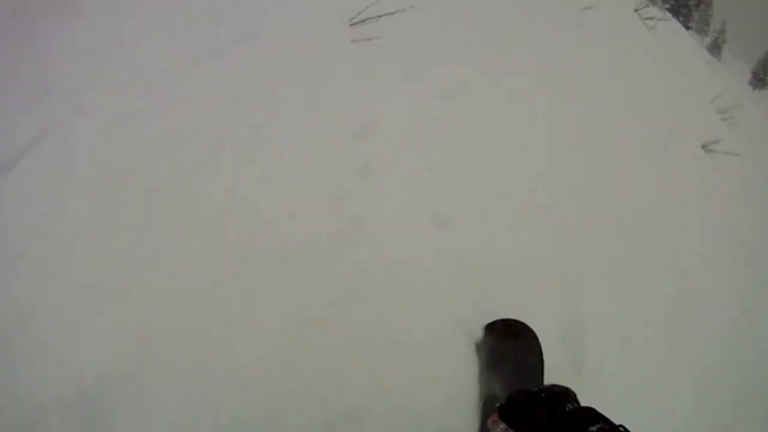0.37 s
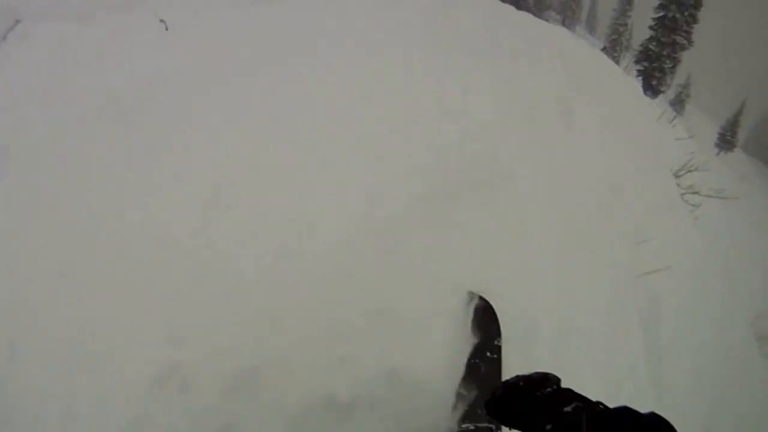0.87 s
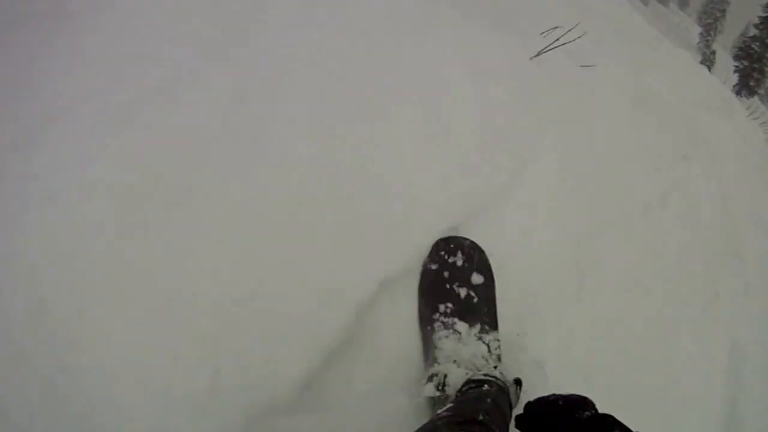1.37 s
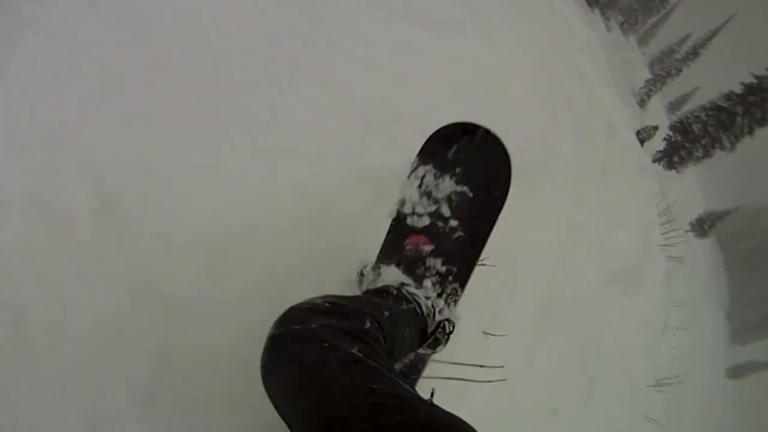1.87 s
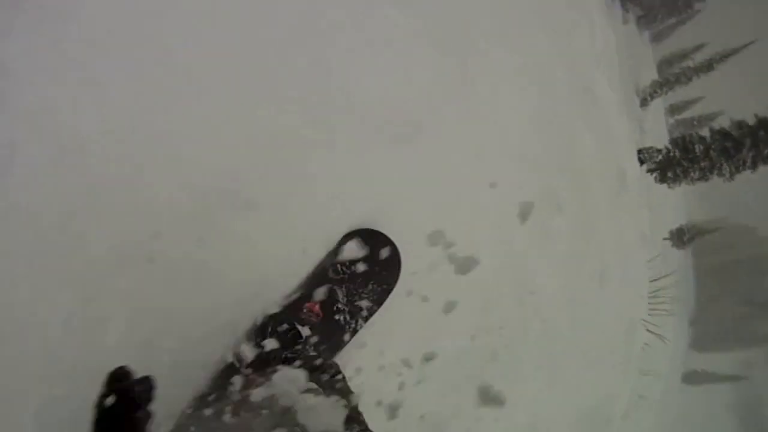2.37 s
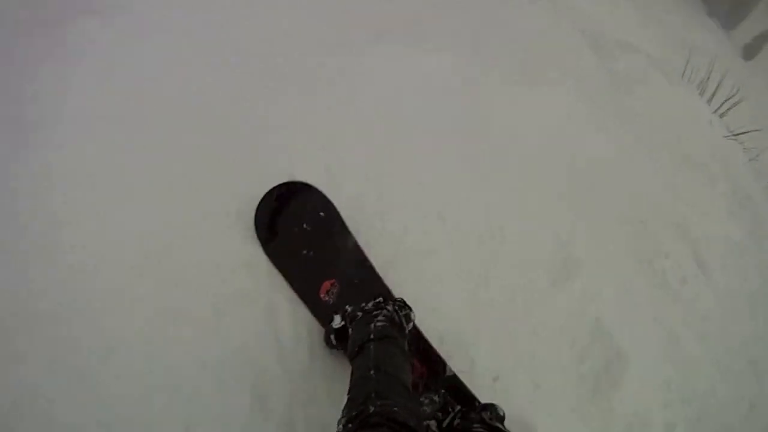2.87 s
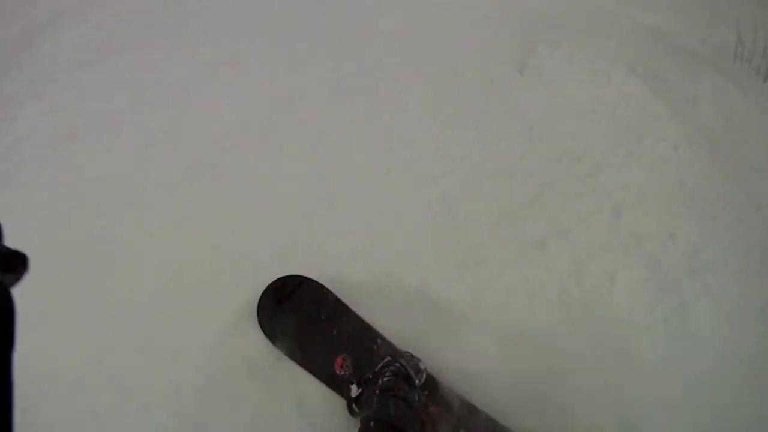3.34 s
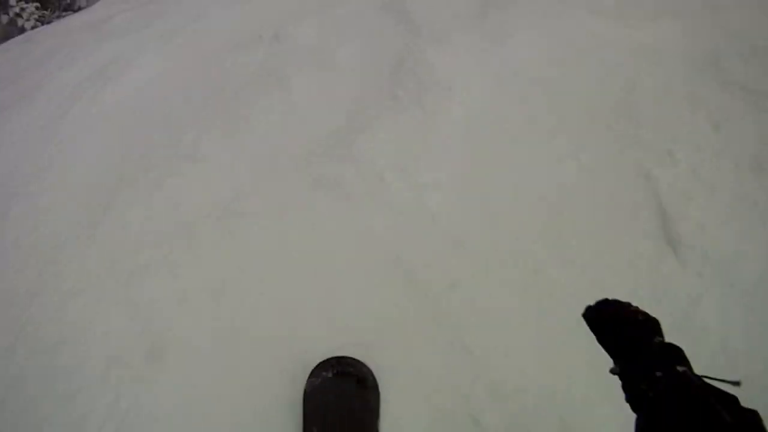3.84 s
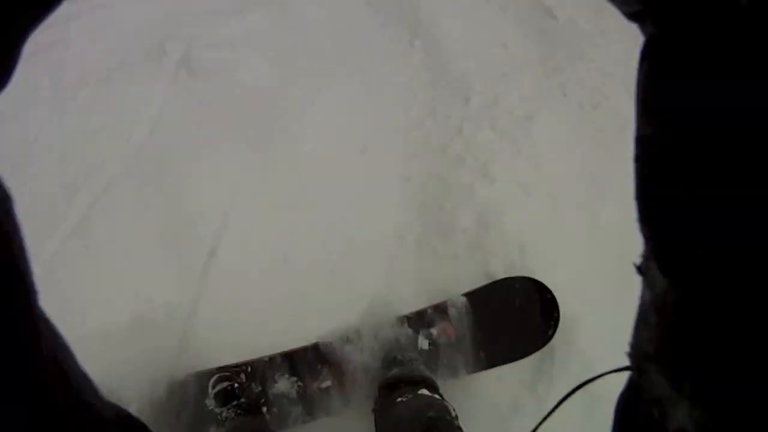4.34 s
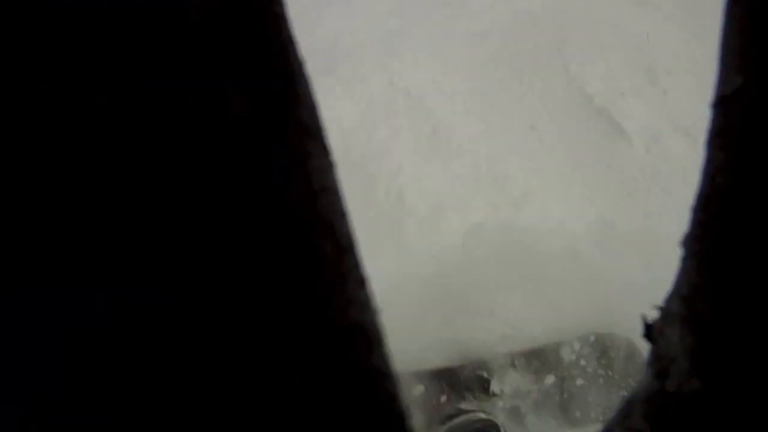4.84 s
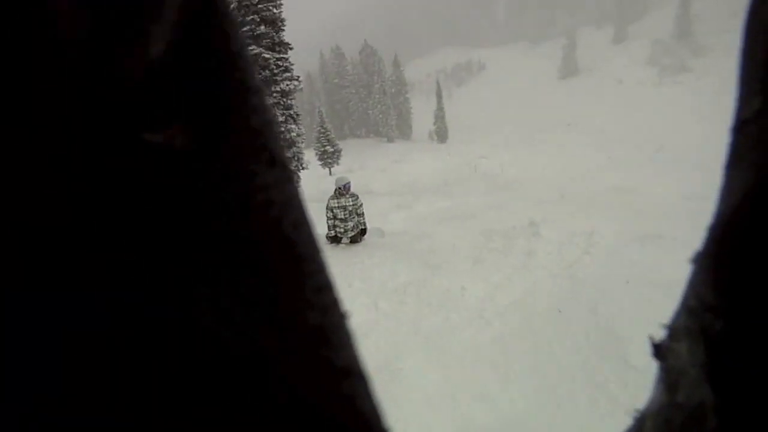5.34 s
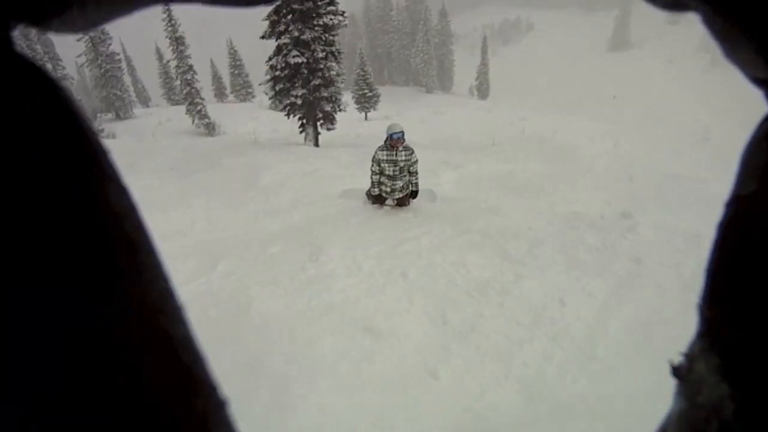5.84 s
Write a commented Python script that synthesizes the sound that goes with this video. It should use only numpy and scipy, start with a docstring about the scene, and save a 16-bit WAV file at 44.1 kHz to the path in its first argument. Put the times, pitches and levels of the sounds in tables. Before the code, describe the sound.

Close, muffled-plastic perspective on an open snowy slope. At first small quick rattles sit on soft granular snow hiss and low wind; sharp cracks with dull thumps strike between about 1.7 and 2.1 seconds. A calmer, fading glide follows. From 4.3 seconds stiff glove fabric scrapes and crackles directly on the microphone case, loud and clipped, with tiny plastic squeaks, ending on a heavy snap.

```python
"""Snowboard ride through powder, the microphone close in, sealed in a plastic housing on the rider's helmet.
From the start wind noise rumbles in lumps, snow gives a grainy hiss over a low murmur, and the housing knocks on
its mount as noise bursts with ringing thumps. Plastic squeaks briefly and snow sprays over the housing on the way.
From about 4.3 s gloves still the mount, rub and snap as dense cloth grains, and overload the microphone.
Hiss, rubs and cracks pass through the housing resonances; the sound is almost mono."""
import sys
import numpy as np
from scipy import signal
from scipy.fft import rfft, irfft, next_fast_len
from scipy.io import wavfile
from scipy.ndimage import uniform_filter1d, map_coordinates

SR = 44100
rng = np.random.default_rng(int(sys.argv[2]) if len(sys.argv) > 2 else 0)


def magnitude_from_level(level_db):
    """Linear magnitude for a level in decibels (20 dB per decade)."""
    exponent = np.asarray(level_db, float) / 20
    return 10 ** exponent


def transcribe(signal):
    """Save signal, clipped to [-1, 1], as a 16-bit WAV file at the path in sys.argv[1]."""
    frames = np.atleast_2d(signal).T
    limited = np.clip(frames, -1, 1)
    pcm = np.round(limited * 32767).astype(np.int16)
    wavfile.write(sys.argv[1], SR, pcm)


N = 262836
GRIP_S = 4.3  # the gloves take hold and still the rattling mount


def unit(x):
    """Scale to rms 1."""
    return x / np.sqrt(np.mean(x ** 2) + 1e-20)


def filtered(x, response):
    """x times a complex response of frequency."""
    m = next_fast_len(N + SR // 4)
    return irfft(rfft(x, m) * response(np.fft.rfftfreq(m, 1 / SR)), m)[..., :N]


def coloured(points):
    """Gain of (f/Hz, level/dB) points on a log axis."""
    f, db = np.transpose(points)
    return lambda hz: magnitude_from_level(np.interp(np.log(hz + 1), np.log(f + 1), db))


def wobble(rate):
    """A smooth random curve, rate knots a second."""
    knots = rng.standard_normal(int(N * rate / SR) + 4)
    return map_coordinates(knots, [np.arange(N) * rate / SR])


def drifting(depth_db):
    """White noise whose colour drifts: random gain patches some hundred Hz wide and tens of ms long."""
    z = signal.stft(rng.standard_normal(N), nperseg=256)[2]
    field = uniform_filter1d(rng.standard_normal(z.shape), 5, axis=0)
    field = uniform_filter1d(field, 12, axis=1)
    patched = z * magnitude_from_level(depth_db * unit(field))
    return unit(signal.istft(patched, nperseg=256)[1][:N])


def crackle(per_second, size_db, t60):
    """Envelope of random small contacts: capped exponential sizes in dB, each dying fast."""
    hit = rng.random(N) < per_second / SR
    size = hit * magnitude_from_level(size_db * np.minimum(rng.exponential(size=N), 3))
    decay = magnitude_from_level(-60 * np.arange(SR // 20) / SR / t60)
    return signal.fftconvolve(size, decay)[:N]


# resonances of the housing around the microphone: (f/Hz, width/Hz, relative level/dB)
RESONANCES = [(1285, 90, -1.5), (1547, 230, -1.5), (1935, 296, 4.5), (2150, 180, -9), (3280, 312, -1.5),
              (4960, 160, -16.5), (7050, 300, -17), (8640, 270, -8), (10260, 720, -9), (13780, 180, -9),
              (14500, 240, -11.5)]
# cancellations in the housing: (f/Hz, distance to 1/e of the depth/Hz, gain at the centre/dB)
CANCELLATIONS = [(5995, 437, -14.5)]


def housing(hz):
    """Causal response of the housing, noise gain 1: resonance powers add, hollows cut, phase is minimal."""
    power = sum(magnitude_from_level(2 * db) / (1 + ((hz * hz - c * c) / (hz * w + 1)) ** 2) for c, w, db in RESONANCES)
    cut_db = sum(db * np.exp(-((hz - c) / w) ** 2) for c, w, db in CANCELLATIONS)
    gain = unit(np.sqrt(power) * magnitude_from_level(cut_db))
    # folding the cepstrum gives the minimum phase
    cepstrum = irfft(np.log(gain + 1e-5))
    half = len(cepstrum) // 2
    cepstrum[1:half] *= 2
    cepstrum[half + 1:] = 0
    return np.exp(rfft(cepstrum))


def groups(hz):
    """The housing's low, middle and high resonances, each group with noise gain 1."""
    under = [1 / (1 + (hz / edge_hz) ** 8) for edge_hz in (2700, 6000)]
    shares = [under[0], under[1] - under[0], 1 - under[1]]
    whole = housing(hz)
    return np.array([share * whole / np.sqrt(np.mean(abs(share * whole) ** 2)) for share in shares])


def microphone(hz):
    """The microphone in its housing: deaf near 12 kHz, closed above about 15.6 kHz."""
    notch = magnitude_from_level(-24 * np.exp(-((hz - 11900) / 1200) ** 2))
    return notch / (1 + (hz / 15600) ** 60)


# side over mid before it flickers: (f/Hz, level/dB)
SIDE_COLOUR = [(50, -39), (300, -18), (1400, -37.5), (5000, -41.5), (14000, -28.5)]


def almost_mono(mid):
    """Two channels that differ by a faint, flickering, filtered copy of the mid."""
    side = filtered(mid * wobble(40), coloured(SIDE_COLOUR))
    return np.array([mid + side, mid - side])


# course of the ride, levels before each layer's trim: (t/s, wind level/dB, snow flow level/dB)
RIDE_COURSE = [(0.0, -56.5, -43), (0.17, -48.5, -48), (0.4, -56, -50.5), (0.75, -53, -52.5),
               (1.04, -54.5, -56), (1.26, -60.5, -51), (1.55, -61, -59), (1.8, -44.5, -54.5),
               (2.13, -44.5, -52.5), (2.38, -49, -52.5), (2.68, -57.5, -54.5), (3.1, -52, -54.5),
               (3.33, -57.5, -58.5), (3.5, -53, -56), (3.64, -73, -63.5), (3.88, -72, -66.5),
               (4.049, -62, -59), (4.3, -63.5, -64), (4.6, -43.5, -47), (4.81, -60, -45), (5.2, -54.5, -65),
               (5.96, -67, -46)]


def levels():
    """Gain per sample of rumble, murmur and hiss; the murmur follows a blend of wind and snow flow."""
    s, wind_db, snow_db = np.transpose(RIDE_COURSE)
    wind_share = 0.53
    murmur_db = -11 + wind_share * wind_db + (1 - wind_share) * snow_db
    return [magnitude_from_level(np.interp(np.arange(N) / SR, s, curve)) for curve in (wind_db, murmur_db, snow_db)]


# wind noise close on the housing, relative spectrum: (f/Hz, level/dB per Hz)
WIND_COLOUR = [(15, -39), (28, -0.5), (54, 2), (80, -12), (140, -28), (200, -52), (300, -120)]


def wind_rumble(gain):
    """Wind is low noise that swells in irregular lumps."""
    noise = filtered(rng.standard_normal(N), coloured(WIND_COLOUR))
    return magnitude_from_level(3.5) * gain * unit(noise * magnitude_from_level(1.9 * wobble(10)))


# low murmur of the board in the snow, relative spectrum: (f/Hz, level/dB per Hz)
MURMUR_COLOUR = [(70, -18), (130, 0.5), (250, -6), (450, -14), (900, -17.5), (1400, -32)]


def board_murmur(gain, grain):
    """The board in the snow murmurs: low noise that feels the snow grains only weakly."""
    noise = rng.standard_normal(N) * grain ** 0.3 * magnitude_from_level(1.5 * wobble(20))
    return magnitude_from_level(-1.0) * gain * unit(filtered(noise, coloured(MURMUR_COLOUR)))


def snow_hiss(gain, grain):
    """Snow grains drive the housing as crackling noise of drifting colour."""
    return gain * filtered(drifting(depth_db=3.0) * grain, housing)


def bed():
    """Wind, murmur and hiss together; murmur and hiss share the same snow grains."""
    rumble, murmur, hiss = levels()
    grain = unit(0.66 + crackle(150, size_db=3.5, t60=0.0083)) * magnitude_from_level(0.17 * wobble(30))
    return wind_rumble(rumble) + board_murmur(murmur, grain) + snow_hiss(hiss, grain)


# short squeaks of plastic slipping on plastic: (t/s, length/s, f/Hz, level/dB)
PLASTIC_SQUEAKS = [(1.875, 0.022, 2070, -41), (3.5, 0.02, 740, -55), (4.567, .014, 1940, -26.5),
                   (4.584, 0.018, 1986, -20.5), (4.702, .012, 1880, -23.5)]


def squeaks():
    """Each squeak is a slightly hoarse tone that swells and fades, with a weak overtone."""
    t, out = np.arange(N) / SR, np.zeros(N)
    for s, length, hz, db in PLASTIC_SQUEAKS:
        phase = 2 * np.pi * np.cumsum(hz * (1 + 0.016 * wobble(250))) / SR
        swell = np.sin(np.pi * np.clip((t - s) / length, 0, 1)) ** 2
        out += magnitude_from_level(db) * swell * (np.sin(phase) + magnitude_from_level(-25) * np.sin(2 * phase))
    return out


def scattered(gain, count, over_db, size_db, bright_db, spread_db, low_db):
    """Small contacts at random moments, as strong as the motion that shakes them loose."""
    when, size = rng.random((count, 2)).T
    colour, weight = rng.standard_normal((count, 2)).T
    local = gain[(when * N).astype(int)]
    peak_db = 20 * np.log10(local + 1e-9) + over_db - size_db * np.log(1 - 0.95 * size)
    rows = np.transpose([when * N / SR, peak_db, bright_db + spread_db * colour, low_db + spread_db * weight])
    return list(rows[local > 0])


def contacts(events, modes, crack_db, thump_db, attack, t60, tail_db, treble_db, follows):
    """A contact is a noise burst with a weak tail into three housing groups, plus a low ringing thump."""
    t = np.arange(SR // 8) / SR
    shape = (magnitude_from_level(-60 * t / t60) + magnitude_from_level(tail_db - 60 * t / 0.02)) * (1 - np.exp(-t / attack))
    shape /= shape.max()
    drive, thump = np.zeros((3, N + len(t))), np.zeros(N + len(t))
    for s, db, bright_db, low_db in events:
        at = slice(round(s * SR), round(s * SR) + len(t))
        burst = rng.standard_normal(len(t)) * shape
        burst *= np.linalg.norm(shape) / np.linalg.norm(burst)
        # brightness lifts the middle group fully and the top group in part
        group_db = np.array([[0], [bright_db], [treble_db + follows * bright_db]])
        drive[:, at] += magnitude_from_level(db + crack_db + group_db) * burst
        ring = np.zeros(len(t))
        for (hz, mode_db, mode_t60), vary_db in zip(modes, rng.normal(0, 2.55, len(modes))):
            ring += magnitude_from_level(mode_db + vary_db - 60 * t / mode_t60) * np.sin(2 * np.pi * hz * t)
        thump[at] -= magnitude_from_level(db + low_db + thump_db) * ring * (1 - np.exp(-t / 0.0014))
    cracks = filtered(drive[:, :N], groups).sum(axis=0)
    return cracks + np.roll(thump, round(0.0019 * SR))[:N]  # the thump follows the crack


# loud taps of the housing on its mount, levels before trim:
# (t/s, peak level/dB, brightness level/dB, thump level over peak/dB)
MOUNT_TAPS = [(0.0659, -35, -8, -24), (0.114, -31.5, -2.5, -31), (0.1319, -32, -1, -20),
              (0.172, -43.5, -13, 0), (0.2067, -34, -7, -18), (0.2526, -24.5, -23, -36),
              (0.2593, -28, -16, -30), (0.2742, -27, -21, -11.5), (0.3383, -36.5, 2, -12),
              (0.346, -37.5, 4, -23), (0.3563, -30.5, -3, -28), (0.4355, -32.5, -5, -33),
              (0.4821, -31, -6, -33), (0.5363, -32.5, -2.5, -29), (0.581, -34, -9, -16),
              (0.593, -33, -16, -19), (0.6222, -37, -3, -19), (0.6363, -33.5, -14, -20),
              (0.7639, -32, -4.5, -14), (0.9192, -38, 4, -24), (1.0386, -35.5, -20, -8.5),
              (1.1436, -34.5, -3.5, -29), (1.1609, -30.5, -11.5, -32), (1.2106, -38, -8, -37),
              (1.5641, -44.5, 3.5, -28), (1.599, -41, -2, -24), (1.6224, -34, -7, -29),
              (1.6649, -9.5, -6, -23.5), (1.755, -36.5, -19, -36), (1.823, -17.5, -28, 0.5),
              (1.8716, -29.5, -17, -26), (1.9328, -14.5, -23, -19), (1.9477, -26, -14, -16),
              (1.956, -24.5, -20, -17), (2.0115, -24, -9, -28), (2.0155, -12.5, -5, -1.5),
              (2.0271, -22, -18, -0.5), (2.0423, -26, -20, -15), (2.05, -23, -2.5, 0),
              (2.0851, -14, -10.5, -32), (2.1143, -34.5, -16, -19), (2.275, -42.5, -13, 0.5),
              (2.435, -41.5, -12, -3), (2.755, -41, -2.5, -10), (2.8016, -38.5, -1, -23),
              (3.0838, -31.5, -17, -31), (3.181, -42.5, 2, -28), (3.2393, -45.5, 2, -20),
              (3.3294, -47, 0.5, -17), (3.5448, -38, -7.5, -32.5), (3.8903, -45.5, -7, -19),
              (4.1002, -18, -5, -21), (4.268, -38.5, -3, -26)]
# helmet and mount modes, before random scatter: (f/Hz, level/dB, t60/s)
MOUNT_MODES = [(53.4, 1, 0.024), (128.3, 8, 0.044), (311, -8.5, 0.063), (563, -3.5, 0.043),
               (716, -15.5, 0.075)]


def mount_taps():
    """The housing knocks and rattles on its mount, small taps following the snow flow until the grip."""
    shaking = levels()[2] * (np.arange(N) < GRIP_S * SR)
    small = scattered(shaking, count=85, over_db=7, size_db=3.0, bright_db=-4.5, spread_db=4.5, low_db=-13)
    return contacts(MOUNT_TAPS + small, MOUNT_MODES, crack_db=-3.0, thump_db=-4.5, attack=0.00041, t60=0.0077,
                    tail_db=-20, treble_db=-4.0, follows=0.29)


# strokes over the housing, first snow spray, then glove cloth:
# (start t/s, end t/s, first level/dB, last level/dB, brightness level/dB)
HOUSING_STROKES = [(1.908, 1.97, -42, -44.5, -2), (2.96, 3.098, -43.5, -58, 4),
                   (4.368, 4.414, -30, -39.5, -0.5), (4.482, 4.547, -28, -38, 1),
                   (4.568, 4.602, -38, -35, 9), (4.697, 4.902, -34.5, -35.5, 7.5),
                   (4.906, 5.085, -39.5, -46, 6.2), (5.088, 5.229, -36, -38.5, 5),
                   (5.236, 5.362, -34.5, -38, 5), (5.403, 5.441, -52, -31.5, 6),
                   (5.445, 5.557, -33.5, -35, 8), (5.559, 5.602, -39, -40.5, 3),
                   (5.603, 5.667, -28.5, -46.5, 7), (5.664, 5.75, -32, -33, 2.5),
                   (5.758, 5.785, -56.5, -48, 6.5), (5.786, 5.95, -41.5, -42, 4.5)]


def strokes():
    """Gain per sample of the strokes and of their treble."""
    t = np.arange(N) / SR
    body, treble = np.zeros((2, N))
    for start, end, first_db, last_db, bright_db in HOUSING_STROKES:
        stroke = magnitude_from_level(np.interp(t, [start, end], [first_db, last_db])) * ((t >= start) & (t < end))
        body += stroke
        treble += magnitude_from_level(bright_db) * stroke
    return body, treble


def crossover(body, treble, hz_cross):
    """Lows of one drive and highs of another, sent through the housing."""
    high = lambda hz: 1 / (1 + (hz_cross / (hz + 1)) ** 4)
    lows = filtered(body, lambda hz: (1 - high(hz)) * housing(hz))
    return lows + filtered(treble, lambda hz: high(hz) * housing(hz))


# low rustle under each stroke, relative spectrum: (f/Hz, level/dB per Hz)
RUSTLE_COLOUR = [(53, -27), (90, 4.5), (204, -0.5), (433, -7.5), (535, -6.5), (694, -11.5), (900, -9),
                 (1170, -22), (1980, -120)]


def rubbing():
    """Spray or cloth slips over plastic: dense grains under each stroke, which starts and stops sharply."""
    body, treble = abs(uniform_filter1d(np.array(strokes()), SR // 300, axis=1))
    grain = unit(1.74 + crackle(300, size_db=7.0, t60=0.0038)) * magnitude_from_level(1.9 * wobble(90))
    slip = grain * drifting(depth_db=2.5)
    rustle = unit(filtered(grain * rng.standard_normal(N), coloured(RUSTLE_COLOUR)))
    return crossover(body * slip, treble * slip, hz_cross=3900) + magnitude_from_level(-13.5) * body * rustle


# loud snaps of glove cloth on the housing, levels before trim:
# (t/s, peak level/dB, brightness level/dB, thump level over peak/dB)
CLOTH_SNAPS = [(4.354, -7.5, -6, -10), (4.4762, -6, -13, -16), (4.4864, -17, -19, -19),
               (4.5193, -16, -21, -26), (4.7037, -34, -12, 2.5), (4.7174, -26.5, 3, -18),
               (4.7416, -16.5, -1.5, -34), (4.7684, -20.5, 5, -30), (4.7745, -18.5, -3, -29),
               (4.7901, -26, -9, -28), (4.8053, -13, -2.5, -18), (4.8346, -14.5, -6.5, -11),
               (4.8689, -16.5, -9, 4.5), (4.8935, -25.5, -1, -1.5), (5.0089, -24, -0.5, -11.5),
               (5.0255, -24, -8, -23), (5.1064, -25.5, 8, -6), (5.1189, -24, 6, -9),
               (5.1337, -21.5, 5.5, -8), (5.161, -23, 4.5, -12), (5.2321, -17, -7, -23),
               (5.248, -18.5, -4.5, -9.5), (5.2628, -25, 6, -10), (5.2755, -21.5, -1, -30),
               (5.2871, -16, 5, -27), (5.2927, -32, -3, -27), (5.307, -14.5, 2.5, -17.5),
               (5.338, -17.5, 2.5, -20), (5.3451, -21, -3, -26), (5.3594, -18, -5.5, -19),
               (5.4286, -26, -22, -18), (5.4895, -28.5, 5.5, -3), (5.5088, -28.5, 6, -19),
               (5.5174, -30, 4, -31), (5.6039, -24, 10.5, -27), (5.6263, -21, 0, -25),
               (5.6356, -21.5, -6, -32), (5.667, -17.5, -8.5, -28), (5.6726, -20, 1, -10),
               (5.6877, -22.5, 2, -25), (5.7024, -17.5, -1, -21), (5.7271, -17, -2.5, -15),
               (5.736, -18.5, -11, -30), (5.753, -21, -9, -30), (5.7885, -30, 6, -29),
               (5.8641, -21.5, -3, -31), (5.8839, -25.5, -1, -5.5), (5.9185, -39.5, -17, 11),
               (5.9547, -6.5, -22, -11.5)]
# a squeezed housing pushes air at the microphone and hardly rings, before scatter: (f/Hz, level/dB, t60/s)
SQUEEZE_MODES = [(93, -10, 0.02), (267, 7, 0.006), (562, 0.5, 0.0058)]


def glove_snaps():
    """Glove cloth snaps on the squeezed housing, small snaps following the strokes after the grip."""
    moving = strokes()[0] * (np.arange(N) > GRIP_S * SR)
    small = scattered(moving, count=120, over_db=5.5, size_db=5.0, bright_db=-2.0, spread_db=6.0, low_db=-15)
    return contacts(CLOTH_SNAPS + small, SQUEEZE_MODES, crack_db=-3.5, thump_db=4.5, attack=0.00013, t60=0.0095,
                    tail_db=-15.5, treble_db=1.5, follows=0.58)


# stiff cloth drives the housing brighter than snow does: (f/Hz, level/dB)
CLOTH_COLOUR = [(500, 0.5), (1000, 0.5), (2000, -0.5), (5000, 2.5), (10500, -4)]


def gloves():
    """Rubs and snaps on the housing, in the colour of stiff cloth."""
    return filtered(rubbing() + glove_snaps(), coloured(CLOTH_COLOUR))


def overloaded(x, limit=0.22):
    """The microphone flattens the loudest rubs: a firm, smooth bend towards the limit."""
    return x / (1 + abs(x / limit) ** 8) ** (1 / 8)


def scene():
    """Glide and grip, heard by the microphone inside the housing."""
    held = overloaded(bed() + gloves())
    mid = held + squeaks() + mount_taps()
    return almost_mono(filtered(mid, microphone))


def top_cut(x):
    """Nothing passes above the cut-off."""
    return signal.sosfilt(signal.butter(12, 16530, fs=SR, output="sos"), x)


def record(dry):
    """The finished mix as the camera stores it."""
    return top_cut(dry)


dry = scene()
out = record(dry)
transcribe(out)
```